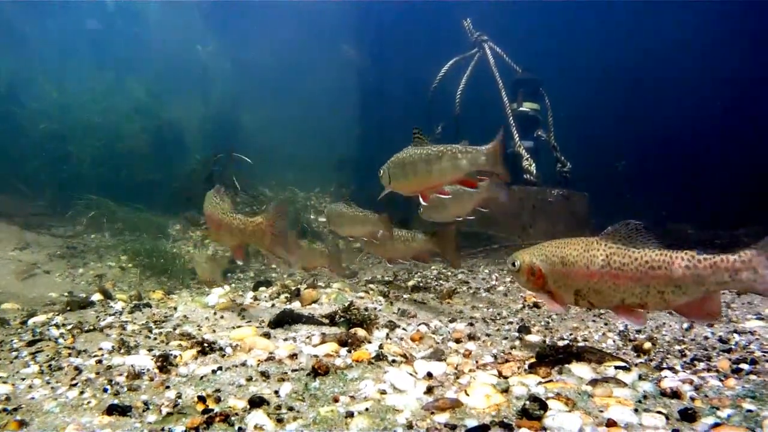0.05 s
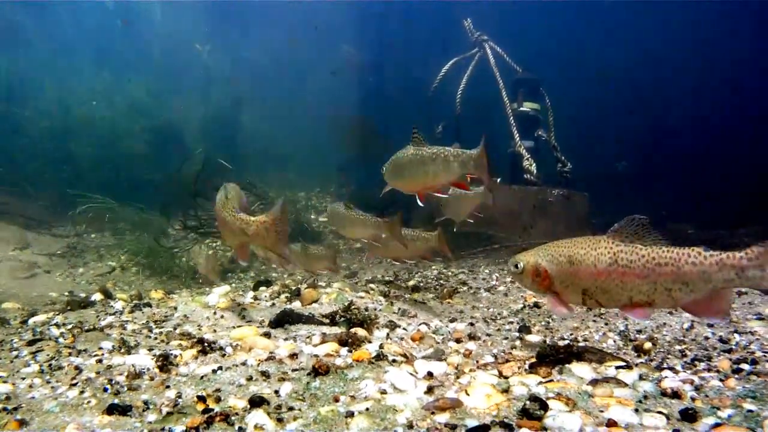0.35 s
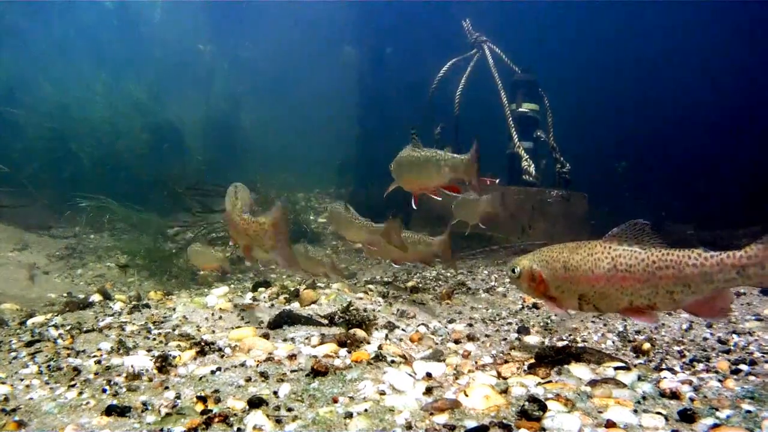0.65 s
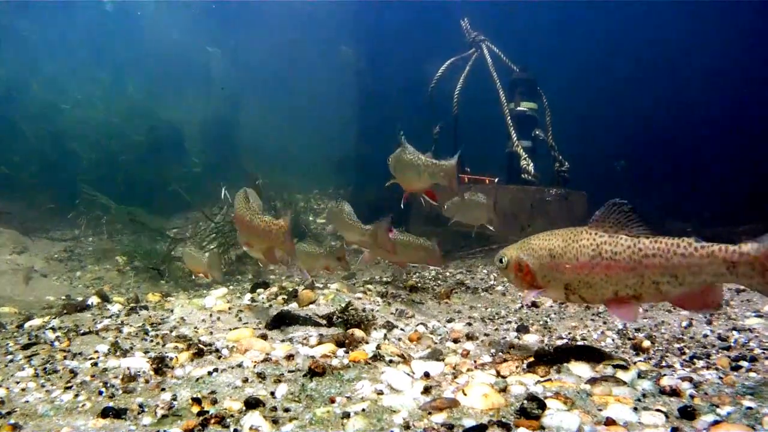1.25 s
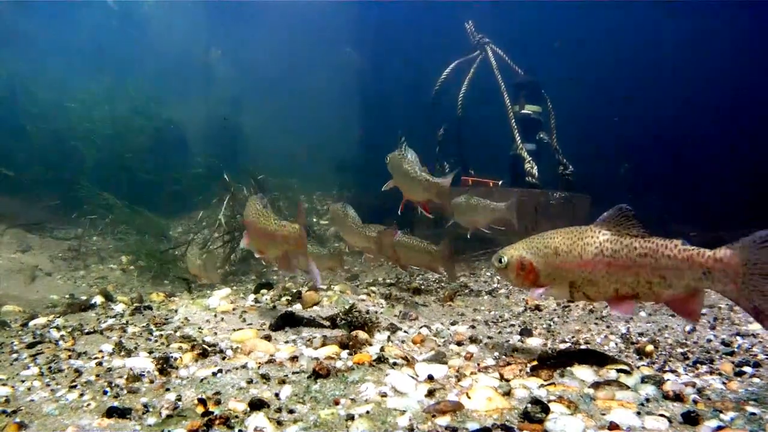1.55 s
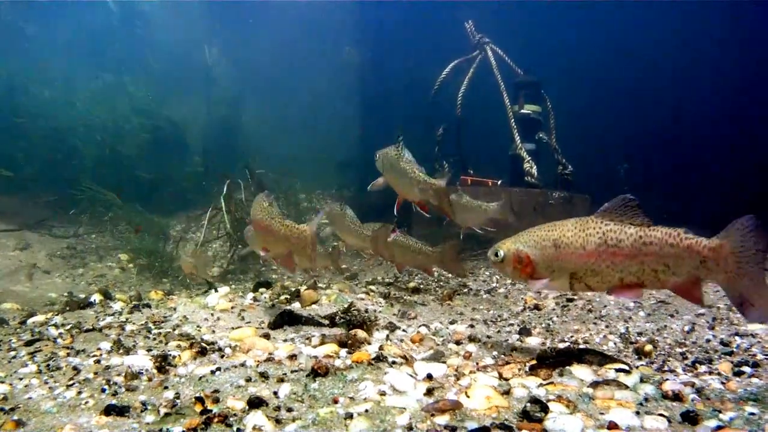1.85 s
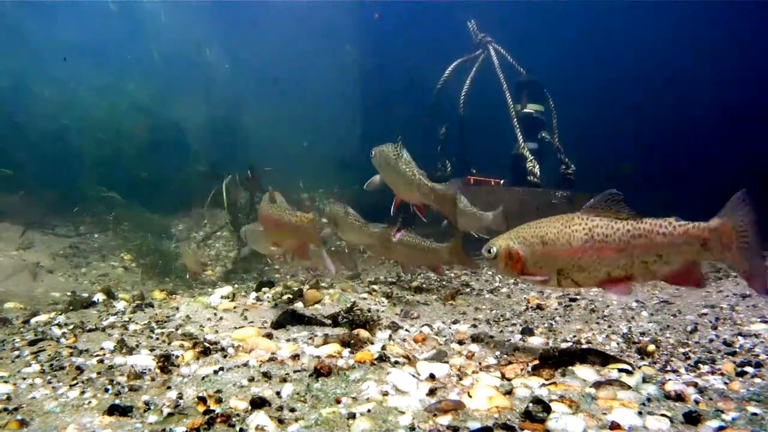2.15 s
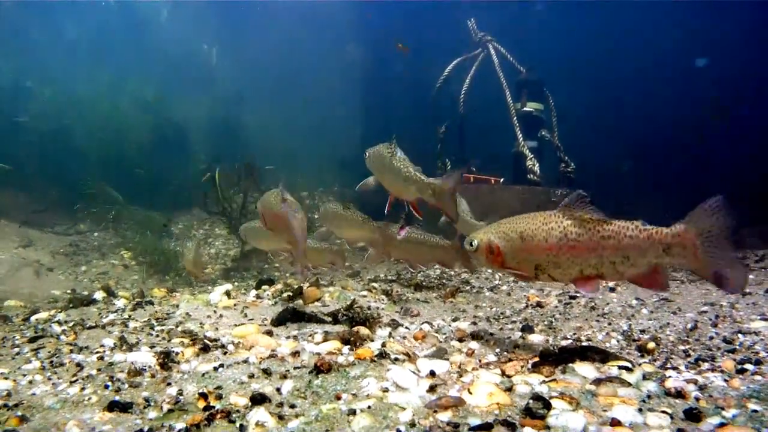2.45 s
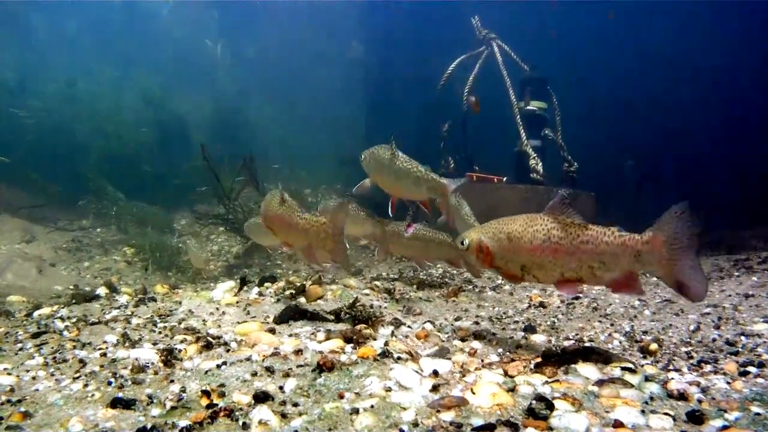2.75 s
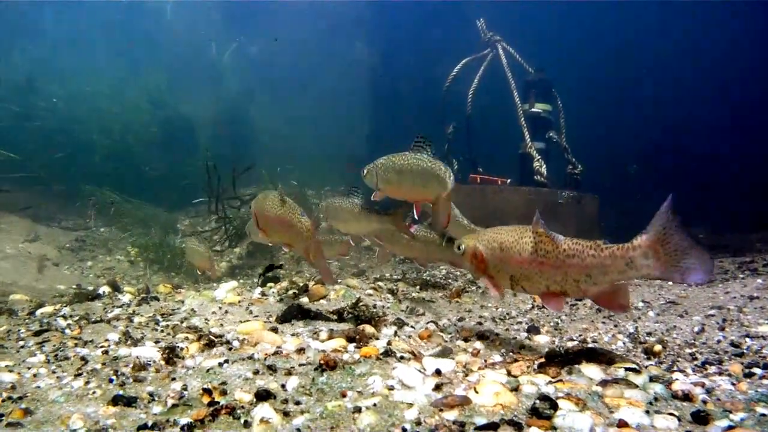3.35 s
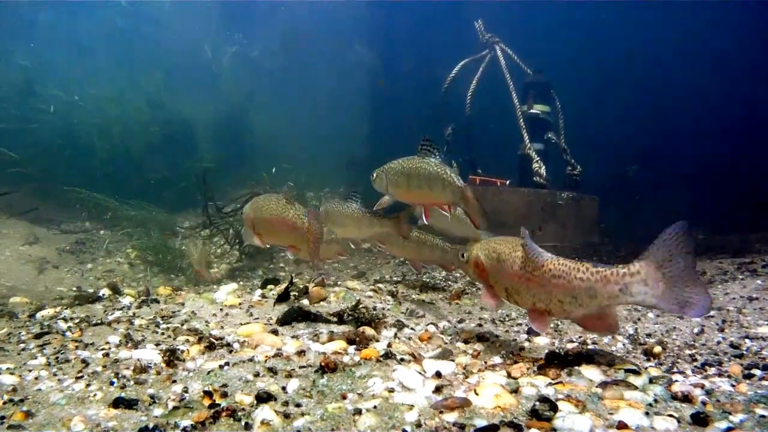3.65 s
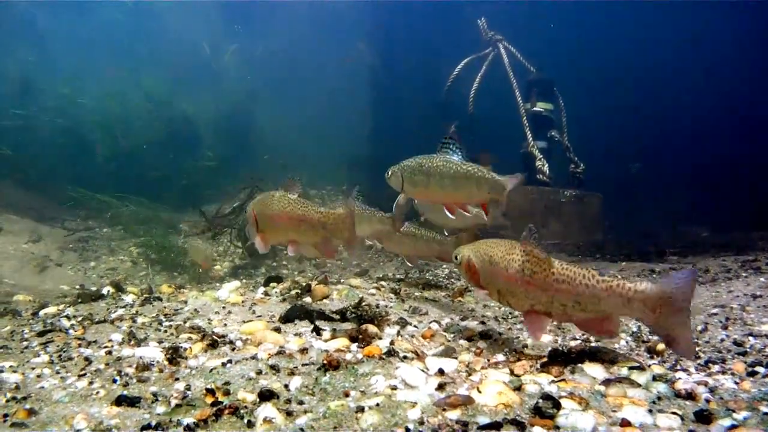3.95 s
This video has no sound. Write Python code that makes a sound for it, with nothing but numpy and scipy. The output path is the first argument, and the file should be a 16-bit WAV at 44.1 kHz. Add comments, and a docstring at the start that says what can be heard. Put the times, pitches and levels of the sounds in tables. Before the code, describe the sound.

Deep river current rumbling underwater, with occasional short runs of gravel grinding and knocking.

```python
"""A deep rumble, heard under water in a shallow river: the current flows round a camera housing.
Now and then something shifts on the bed, probably gravel: short runs of grinding, soft bumps,
and knocks that make the housing ring. The recorder hisses and holds each sample at a low rate,
which mirrors the knocks faintly into the treble."""
import sys
import numpy as np
from scipy import signal
from scipy.fft import rfft, irfft
from scipy.io import wavfile
from scipy.ndimage import uniform_filter1d

SR = 44100
rng = np.random.default_rng(int(sys.argv[2]) if len(sys.argv) > 2 else 0)


def master(y):
    """Save y as 16-bit WAV."""
    cut = np.clip(np.atleast_2d(y).T, -1, 1)
    pcm = np.round(cut * 32767)  # scale
    wavfile.write(sys.argv[1], SR, pcm.astype(np.int16))


N = 176400
TIME = np.arange(N) / SR

# The tone of four steady noises. Each row: frequency in Hz, relative strength in dB.
HISS_TONE = [(100, -11.5), (1000, 2.5), (2000, -0.5), (3000, 1), (4000, 0), (5200, -1.5), (5600, -6.5),
             (6000, -14)]
SIDE_HISS_TONE = [(100, -12.5), (1000, 0.5), (2000, -3), (3500, -1), (4800, -0.5), (5600, -4), (6000, -34)]
RUMBLE_TONE = [(10, -13.5), (18, -6.5), (26, 0.5), (39, -7), (50, -9), (70, -23.5), (120, -56), (300, -86)]
WASH_TONE = [(20, -2), (50, -4.5), (75, 1.5), (110, -6.5), (160, -10), (240, -15), (450, -18), (700, -22.5),
             (1000, -27), (1500, -27.5), (2200, -29.5), (3000, -46.5), (6000, -55)]
# How the rumble rises and falls. Each row: time in seconds, level in dB before the boost.
RUMBLE_LEVELS = [(0.0, -43), (0.02, -50), (0.28, -57.5), (1.0, -50.5), (1.05, -57), (1.16, -51.5),
                 (1.88, -50.5), (2.06, -62), (2.08, -53.5), (2.24, -48.5), (2.31, -58), (2.39, -50.5),
                 (3.17, -54.5), (3.24, -50), (3.45, -53), (3.49, -48), (3.91, -59.5), (4.0, -48)]
# The ways the housing rings. Each row: pitch in Hz, width in Hz, relative level in dB.
HOUSING_RINGS = [(370, 267, 0.5), (745, 170, 0.5), (949, 150, 0.5), (1126, 280, -15), (1435, 140, -9),
                 (2154, 260, -5)]
# Grinding runs. Each row: peak time, rise and fall in seconds, then grit and boom levels in dB.
GRIND_RUNS = [(1.22, 0.085, 0.079, -59, -54), (1.925, 0.014, 0.022, -65, -55),
              (2.72, 0.11, 0.035, -65, -67), (2.86, 0.024, 0.046, -66, -62),
              (3.345, 0.036, 0.048, -51.5, -51.5), (3.43, 0.014, 0.022, -60.5, -54),
              (3.58, 0.021, 0.017, -58.5, -63.5)]
# Soft bumps. Each row: start in seconds, pitch in Hz, level in dB.
SOFT_BUMPS = [(.055, 75, -47.5), (1.172, 147, -47), (1.195, 159, -43.5), (1.215, 150, -46),
              (1.914, 160, -52), (2.692, 79, -46.5), (3.329, 167, -44), (3.426, 100, -38),
              (3.783, 189, -55)]
# Knocks. Each row: start in seconds, thud, clack and ring levels in dB, clack pitch in Hz.
GRAVEL_KNOCKS = [(.602, -72, -63, -56.5, 1000), (.620, -70, -62, -63, 1000), (1.134, -60, -59, -77, 1000),
                 (1.170, -55, -53, -77, 970), (1.198, -51, -52.5, -65, 950), (1.225, -54, -55, -58, 1100),
                 (1.244, -45, -45, -75, 754), (1.274, -62, -53, -67, 950), (1.303, -54, -55, -66, 990),
                 (1.909, -51, -61, -59, 905), (1.928, -52, -59, -75, 705), (2.063, -58, -58, -68, 840),
                 (2.295, -57, -54.5, -59, 910), (2.716, -53, -45.5, -70, 830), (2.721, -53, -47, -58, 754),
                 (2.730, -57, -57, -79, 754), (2.737, -56, -62, -61, 950), (2.751, -43, -63, -61, 594),
                 (2.755, -67, -46, -61, 715), (2.761, -66, -55, -72, 750), (2.837, -73, -55, -57.5, 970),
                 (2.864, -76, -57.5, -74, 940), (2.883, -73, -52.5, -53, 1030),
                 (3.072, -57.5, -54, -61.5, 1030), (3.289, -52, -46.5, -58, 860),
                 (3.297, -50.5, -65, -60.5, 950), (3.306, -62, -46.5, -61, 824),
                 (3.327, -48, -44.5, -60, 890), (3.344, -64, -52, -53.5, 1010),
                 (3.355, -48, -47, -60, 1030), (3.380, -52, -49, -55, 940), (3.385, -52, -47.5, -55, 1010),
                 (3.391, -41.5, -38, -55, 880), (3.397, -46.5, -48, -58, 840), (3.413, -65, -43, -55, 920),
                 (3.426, -49.5, -43.5, -55, 910), (3.451, -53, -64, -74, 900), (3.598, -57, -58, -65, 890),
                 (3.891, -55, -54.5, -68, 1020), (3.934, -48, -80, -74, 700), (3.952, -61, -67, -63, 950)]


def from_db(db):
    """Turn decibels into a number to multiply by."""
    return 10 ** (np.asarray(db) / 20)


def rms_one(sound):
    """Scale a sound so its average level (rms) is 1."""
    return sound / np.sqrt(np.mean(sound ** 2) + 1e-20)


def level(sound, span_s):
    """Follow the level of a sound, averaged over a short span."""
    return np.sqrt(np.abs(uniform_filter1d(sound ** 2, max(int(span_s * SR), 1))) + 1e-20)


def noise(tone):
    """Make steady noise with the given tone, at level 1."""
    hz, db = np.transpose(tone)
    all_hz = np.maximum(np.arange(N // 2 + 1) * SR / N, 1)
    gains = from_db(np.interp(np.log(all_hz), np.log(hz), db))
    return rms_one(irfft(rfft(rng.standard_normal(N)) * gains, N))


def resonate(sound, hz, width_hz):
    """Ring around one pitch; a wider band dies away sooner."""
    low = max(np.sqrt(hz ** 2 + width_hz ** 2 / 4) - width_hz / 2, 10)
    band = signal.butter(2, [low, low + width_hz], "band", fs=SR, output="sos")
    return signal.sosfilt(band, sound + 1e-18)


def strike(clicks, db, hz, width_hz):
    """Clicks set off one ring, whose level peaks at db."""
    ring = resonate(clicks, hz, width_hz)
    return from_db(db) * ring / level(ring, span_s=.002).max()


def add(out, start_s, sound):
    """Mix a short sound in at its start time."""
    start = int(start_s * SR)
    out[start:start + len(sound)] += sound[:max(N - start, 0)]


def recorder_hiss():
    """The recorder hisses, a little differently left and right."""
    middle = noise(HISS_TONE)
    side = from_db(-10) * noise(SIDE_HISS_TONE)
    return from_db(-68) * np.array([middle + side, middle - side])


def current(boost_db=2, wash_db=-56.5, waver_db=.9, wavers_per_s=16):
    """Swirls of water rumble round the housing, over the river's dull, wavering wash."""
    swirls, wash = noise(RUMBLE_TONE), noise(WASH_TONE)
    rumble_db = np.interp(TIME, *np.transpose(RUMBLE_LEVELS)) + boost_db
    rumble = from_db(rumble_db) * swirls / level(swirls, span_s=.12)
    waver = rms_one(np.interp(TIME * wavers_per_s, np.arange(400), rng.standard_normal(400)))
    return rumble + from_db(wash_db + waver_db * waver) * wash


def grains(per_s):
    """Grains touch at random moments, making tiny clicks of uneven size."""
    size_db = np.minimum(rng.exponential(1, N), 4)
    clicks = from_db(size_db) * rng.choice([-1, 1], N)
    return clicks * (rng.random(N) < per_s / SR)


def housing(clicks):
    """Clicks make the housing ring at several pitches at once."""
    rings = [from_db(db) * rms_one(resonate(clicks, hz, width)) for hz, width, db in HOUSING_RINGS]
    return rms_one(sum(rings))


def grinding():
    """Crowds of clicks swell and fade over a low boom; stray grains tick all the time."""
    clicks = grains(per_s=900)
    grit = housing(clicks)
    grit /= level(grit, span_s=.04)
    boom = resonate(clicks, hz=141.6, width_hz=76)
    boom /= level(boom, span_s=.028)
    out = from_db(-72) * housing(grains(per_s=160))   # the stray grains
    for peak_s, rise_s, fall_s, grit_db, boom_db in GRIND_RUNS:
        width_s = np.where(TIME < peak_s, rise_s, fall_s)
        swell = np.exp(-.5 * ((TIME - peak_s) / width_s) ** 2)
        out += swell * (from_db(grit_db) * grit + from_db(boom_db) * boom)
    return out


def bumps():
    """Each bump is one soft tap that sounds only in the bass."""
    out = np.zeros(N)
    tap = signal.unit_impulse(SR // 10)
    for start_s, hz, db in SOFT_BUMPS:
        add(out, start_s, strike(tap, db, hz, width_hz=.61 * hz))
    return out


def knocks(touches=5, slip_s=.0045, fade_db=5):
    """Each knock is a short slip: quick touches, each weaker, sound a thud, a clack and a ring."""
    out = np.zeros(N)
    for start_s, thud_db, clack_db, ring_db, clack_hz in GRAVEL_KNOCKS:
        along = np.r_[0, rng.random(touches - 1)]   # 0 is the slip's start, 1 its end
        sizes = from_db(-fade_db * along) * rng.choice([-1, 1], touches)
        clicks = np.zeros(SR // 20)
        clicks[(along * slip_s * SR).astype(int)] = sizes
        thud = strike(clicks, thud_db, hz=293, width_hz=340)
        clack = strike(clicks, clack_db, clack_hz, width_hz=325)
        ring = strike(clicks, ring_db, hz=2115, width_hz=280)
        add(out, start_s, thud + clack + ring)
    return out


def scene():
    """Mix the hiss with the river, which is the same left and right."""
    return recorder_hiss() + current() + bumps() + knocks() + grinding()


def record(dry, hold_hz=12000, cutoff_hz=15300):
    """The recorder samples slowly, holds each value and cuts the highest treble."""
    slow = signal.resample(dry, N * hold_hz // SR, axis=1)
    held = signal.resample(np.repeat(slow, 4, axis=1), N, axis=1)
    treble_cut = signal.ellip(12, .1, 70, cutoff_hz, fs=SR, output="sos")
    return signal.sosfilt(treble_cut, held)


dry = scene()
out = record(dry)
master(out)
```